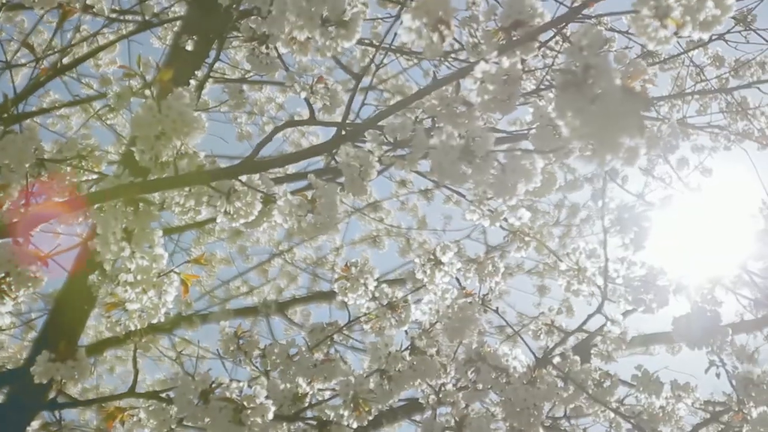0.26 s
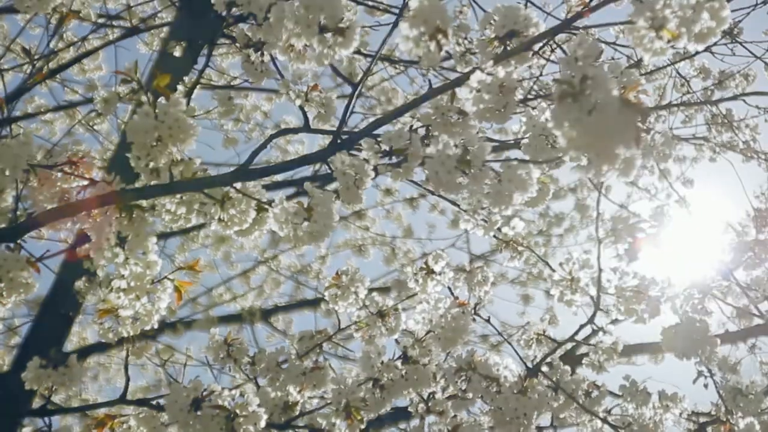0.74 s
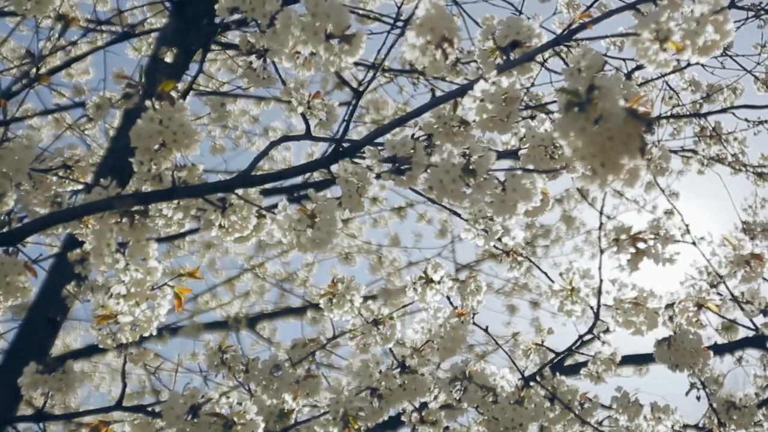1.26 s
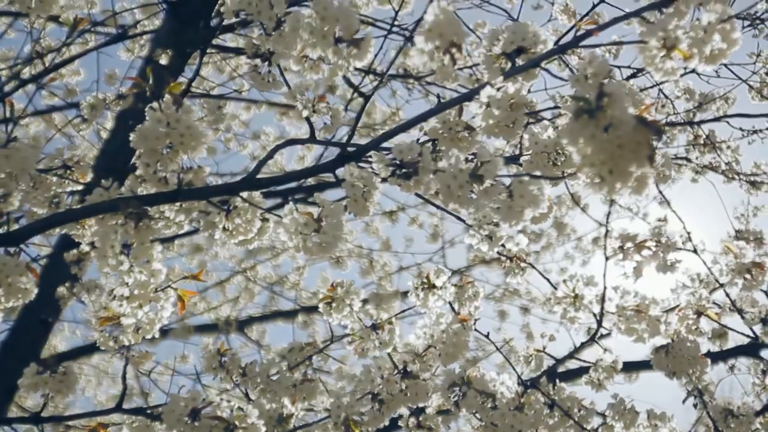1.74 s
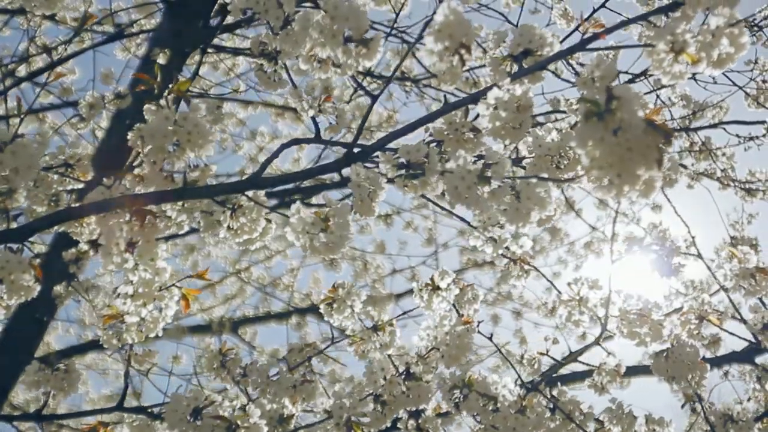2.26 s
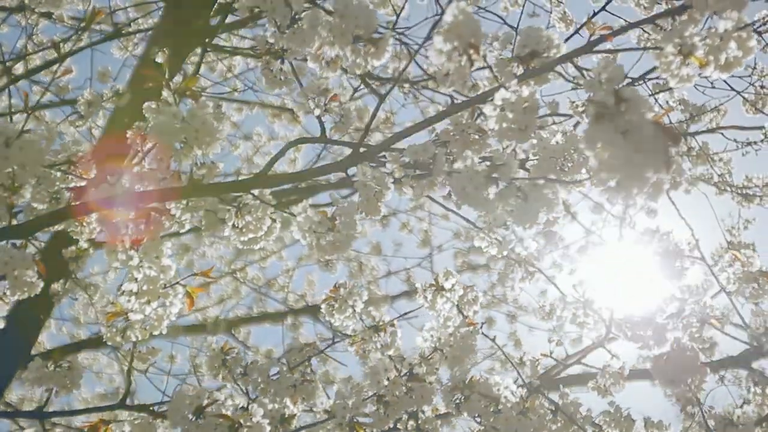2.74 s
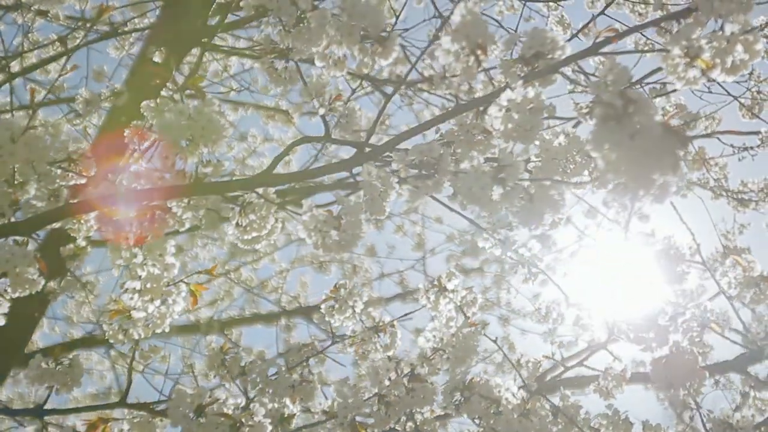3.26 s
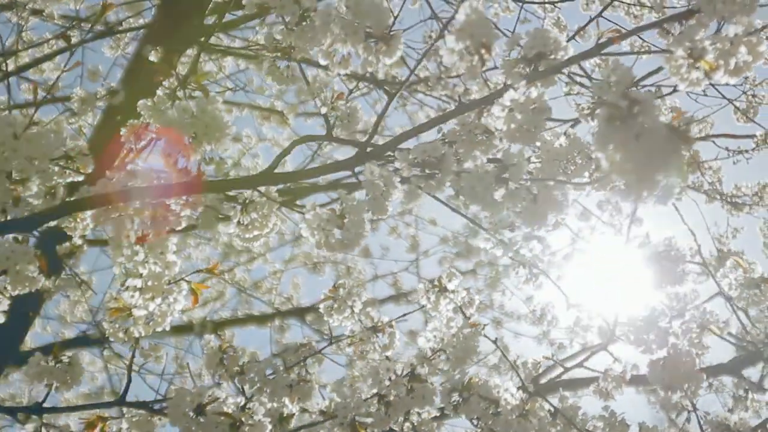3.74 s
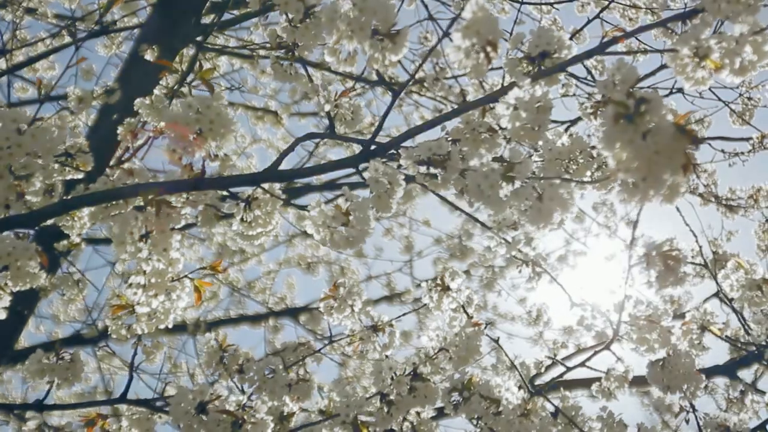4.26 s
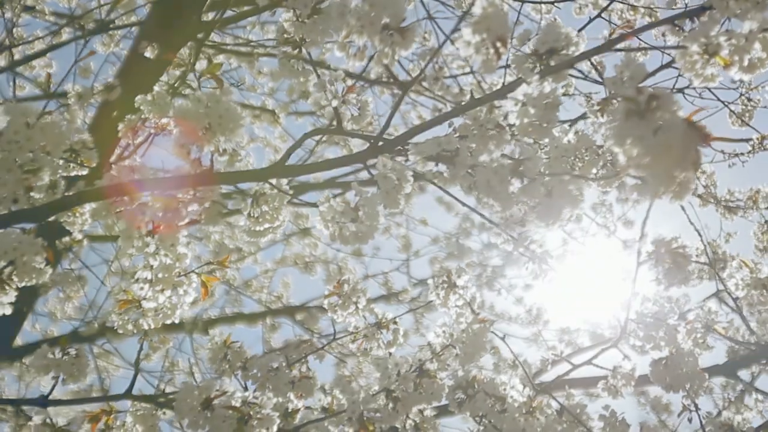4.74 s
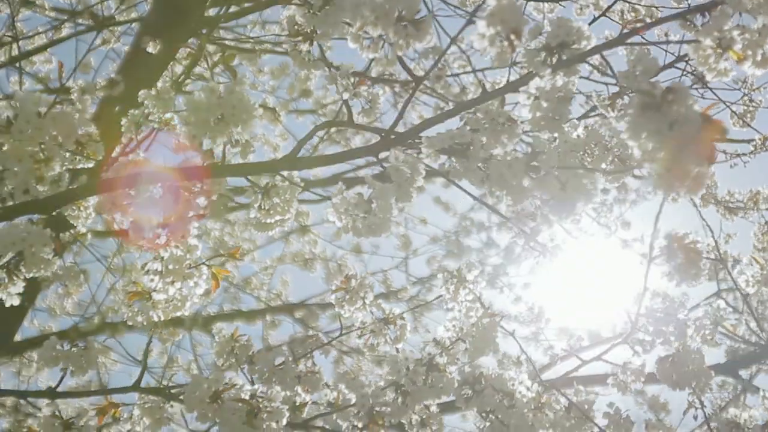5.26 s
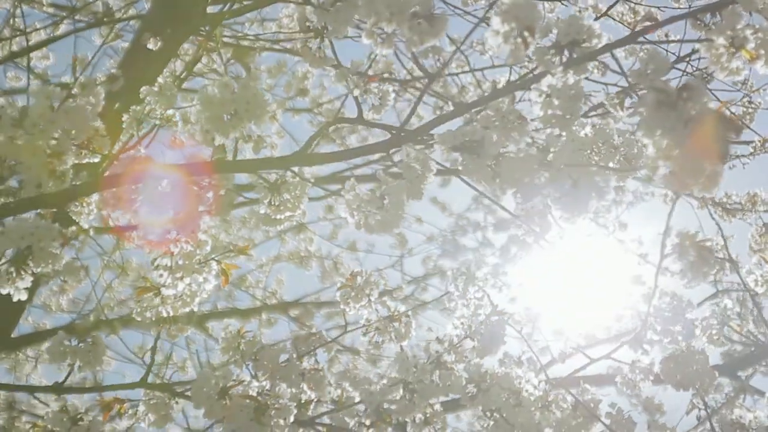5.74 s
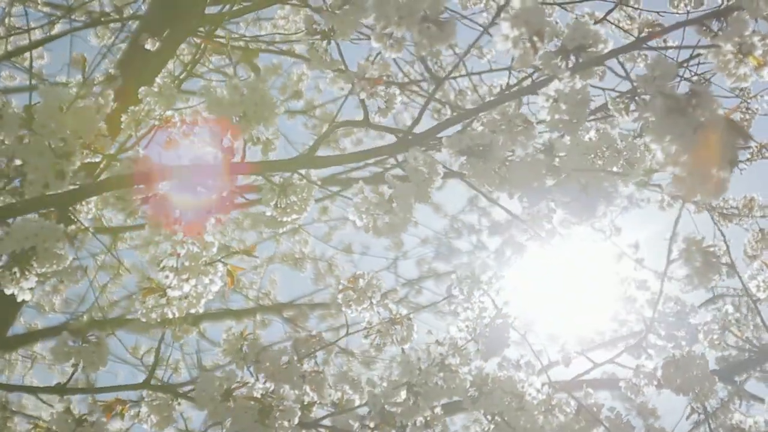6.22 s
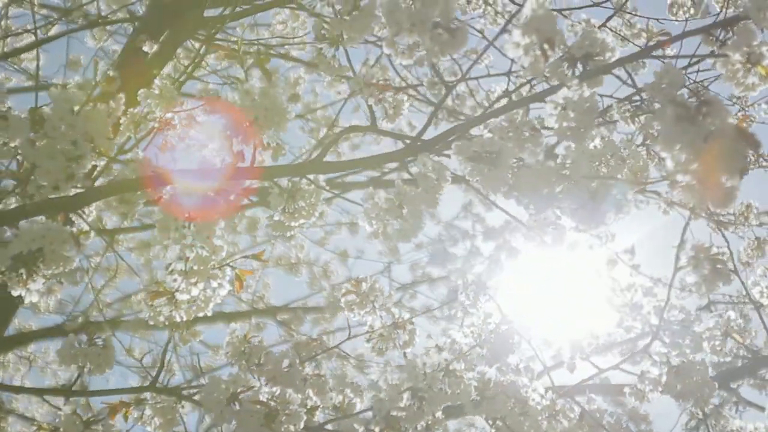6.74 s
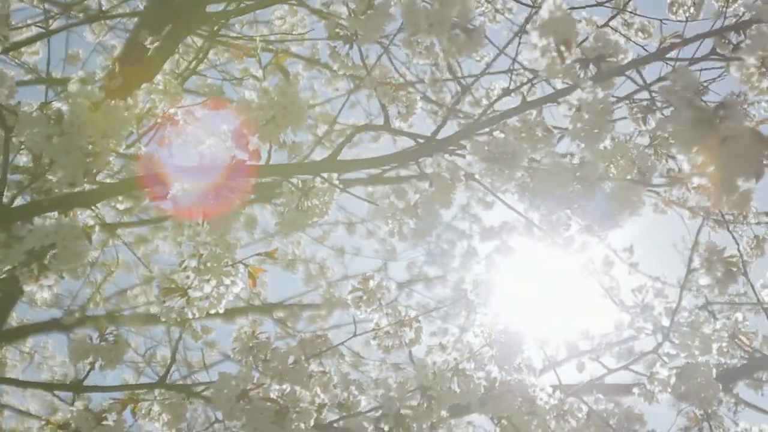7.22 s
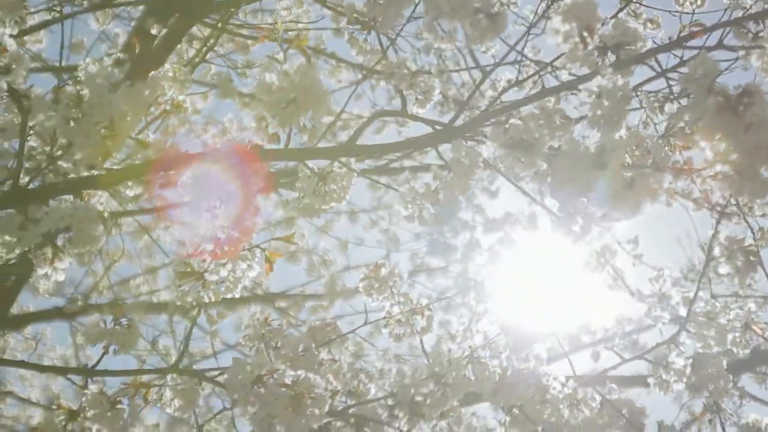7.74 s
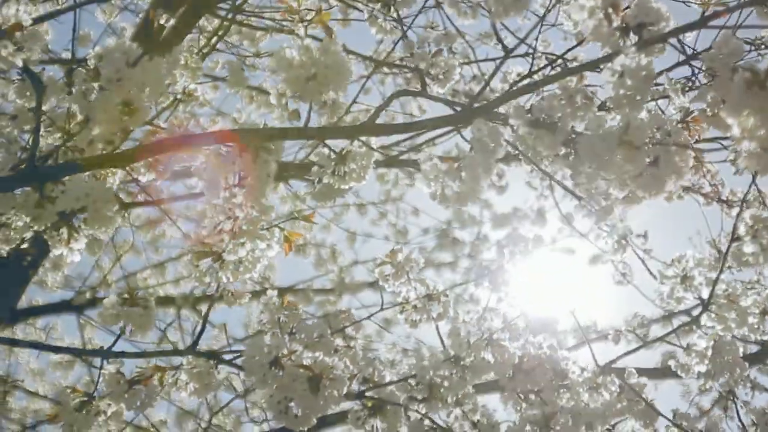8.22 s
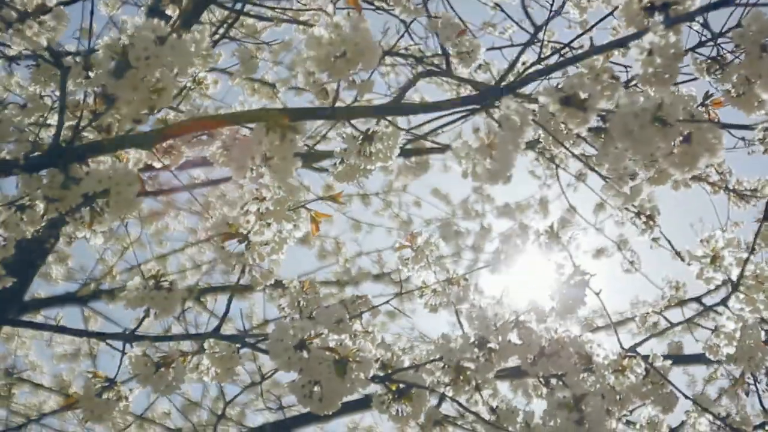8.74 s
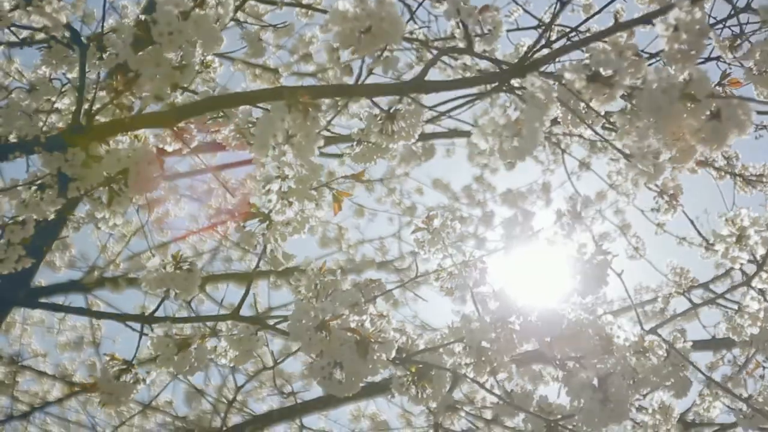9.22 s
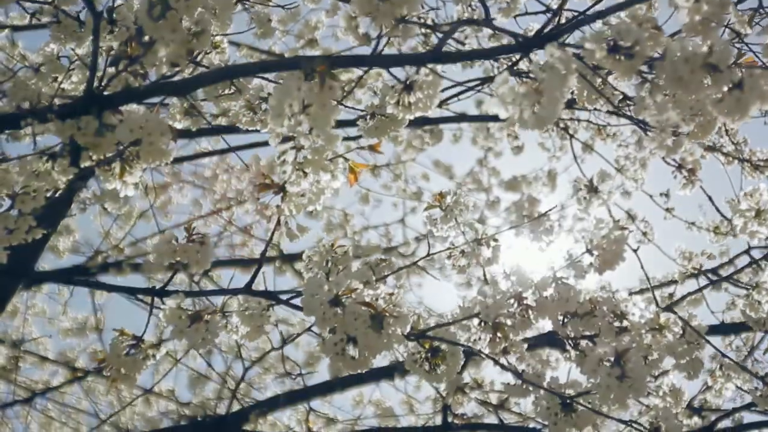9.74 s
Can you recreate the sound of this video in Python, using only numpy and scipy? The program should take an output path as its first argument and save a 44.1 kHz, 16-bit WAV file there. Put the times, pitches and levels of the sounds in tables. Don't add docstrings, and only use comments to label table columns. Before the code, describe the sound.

Stereo microphone in a spring garden among trees and walls. Brief high twitter opens, then sparse paired finch chirps on the left. A thrush there alternates falling and rising whistles. A blackbird a few paces ahead flutes mellow notes, warbles loudly, then twitters and rattles into two-voiced notes. A sharp twig or beak snap and a rising chirp follow, then faint distant warblers and traffic hush.

```python
import sys
import numpy as np
from scipy import signal
from scipy.fft import rfft, irfft, next_fast_len
from scipy.io import wavfile
from scipy.ndimage import uniform_filter1d, map_coordinates

SR = 44100
rng = np.random.default_rng(int(sys.argv[2]) if len(sys.argv) > 2 else 0)


def transcribe(u):
    v = np.clip(np.atleast_2d(u).T, -1, 1)
    q = np.round(v * 32767).astype(np.int16)
    wavfile.write(sys.argv[1], SR, q)


def volts_from_db(level):
    exponent = np.asarray(level, float) / 20
    return 10 ** exponent


N = 440118


def add(out, start_s, x):
    i = int(round(start_s * SR))
    out[max(i, 0):i + len(x)] += x[max(-i, 0):N - i]


def delay(x, ms):
    size = next_fast_len(N)
    turns = np.arange(size // 2 + 1) / size * ms * SR / 1000
    return irfft(rfft(x, size) * np.exp(-2j * np.pi * turns), size)[:N]


def drift(rate_hz, channels=1):
    hold = int(SR / rate_hz)
    steps = np.repeat(rng.standard_normal((channels, N // hold + 1)), hold, axis=1)[:, :N]
    return uniform_filter1d(steps, hold)


def shimmer(db, rate_hz, channels=1):
    return volts_from_db(db * drift(rate_hz, channels))


WALL_MS = dict(blackbird=15, thrush=121, finch=60, far=70)
# delay/ms, level/dB
NEAR = dict(blackbird=(3.3, -17), thrush=(6, -16), finch=(11, -6), far=(8, -8))


def garden(dry, bird, pan_db, lag_ms, scatter_db, t60_s, echo_db):
    sway_ms, sway_hz, alike = .12, 18, 0.47
    t = np.arange(int(.8 * SR)) / SR
    shared, own = rng.standard_normal(len(t)), rng.standard_normal((2, len(t)))
    noise = np.sqrt(alike) * shared + np.sqrt(1 - alike) * own
    dull = signal.lfilter([.4], [1, -.6], noise)
    bright = (noise - dull) * volts_from_db(-60 * t / 0.47)
    cloud = (dull + bright) * volts_from_db(-60 * t / t60_s) * np.clip(t / 0.0025, 0, 1)
    cloud *= volts_from_db(scatter_db) / np.sqrt(np.sum(cloud ** 2, axis=1, keepdims=True))

    sides_db = np.array([[pan_db], [-pan_db]])
    direct = np.array([delay(dry, lag_ms), dry]) * volts_from_db(sides_db / 2)
    near_ms, near_db = NEAR[bird]
    bounce = np.array([delay(dry, near_ms * 1.06), delay(dry, near_ms)])
    direct = direct + volts_from_db(near_db) * bounce * shimmer(3, 25, channels=2) * volts_from_db(sides_db / 2)

    sway = sway_ms * SR / 1000 * drift(sway_hz)[0]
    swayed = map_coordinates(dry, [np.arange(N) + sway], mode="nearest")
    scattered = signal.fftconvolve(swayed[None], cloud, axes=1)[:, :N] * shimmer(3.04, 40, channels=2)
    heard = direct + scattered * volts_from_db(sides_db / 4)

    late = WALL_MS[bird] * SR // 1000
    heard[:, late:] += volts_from_db(echo_db) * signal.lfilter([1, -.7], [1], heard[::-1, :N - late])
    return heard


def trace(rows, smooth_s=0.0051):
    s, *columns = np.transpose(rows)
    t = np.arange(s.min(), s.max(), 1 / SR)
    gate = np.clip(np.minimum(t - t[0], t[-1] - t) / 0.0021, 0, 1)
    width = int(min(smooth_s, np.ptp(s) / 10) * SR)
    return t, gate, [uniform_filter1d(np.interp(t, s, c), width, mode="nearest") for c in columns]


def phase_of(hz, waver=0.0022):
    tremble = uniform_filter1d(rng.standard_normal(len(hz)), 100) * 10
    return 2 * np.pi * (rng.random() + np.cumsum(hz * (1 + waver * tremble)) / SR)


def whistle(out, rows, overtones_db=(0,), shift_s=0, db=0, factor=1, warble=np.zeros_like, throb=0,
            rough=0.45, effort=0.42):
    beak_dip_hz, beak_dip_width_hz, beak_dip_db = 8700, 900, -10
    t, gate, (hz, level_db, *depth_hz) = trace(rows)
    turn = warble(t)
    hz = factor * hz + sum(depth_hz) * (np.sin(turn) + 0.22 * np.sin(2 * turn))
    gate = gate * (1 + np.clip(throb * sum(depth_hz) / 200, 0, 1) * np.sin(turn))
    phase = phase_of(hz)
    wave = np.sin(phase)
    for k, over_db in enumerate(overtones_db[1:], 2):
        flutter = 1 + rough * 8 * uniform_filter1d(rng.standard_normal(len(t)), 64)
        push_db = (k > 2) * effort * (level_db + db + 25)
        dip_db = beak_dip_db * np.exp(-((k * hz - beak_dip_hz) / beak_dip_width_hz) ** 2)
        wave += volts_from_db(over_db + push_db + dip_db) * flutter * np.sin(k * phase) * (k * hz < SR / 2)
    add(out, t[0] + shift_s, np.sqrt(2) * gate * volts_from_db(level_db + db) * wave)


def repeat(out, shape, calls, overtones_db=(0,), lift_db=0, warble_hz=0, throb=0):
    def uneven_warble(t):
        wander = .8 * 20 * uniform_filter1d(rng.standard_normal(len(t)), size=400)
        return 2 * np.pi * warble_hz * t + wander

    for s, db, *own in calls:
        factor, stretch = [*own, 1, 1][:2]
        rows = np.array(shape, float).T
        rows[0] *= stretch
        whistle(out, rows.T, overtones_db, s, db + lift_db, factor, uneven_warble, throb)


def coloured(points, db, offset=((1, 0), (2, 0))):
    size = next_fast_len(N)
    log_hz = np.log(np.arange(1, size // 2 + 2) * SR / size)

    def gain(curve):
        hz, curve_db = np.transpose(np.array(curve))
        return volts_from_db(np.interp(log_hz, np.log(hz), curve_db))

    shape = gain(points)
    noise = irfft(rfft(rng.standard_normal(size)) * shape * gain(offset), size)[:N]
    return noise * volts_from_db(db) / np.sqrt(np.mean(shape ** 2))


def swells(events):
    rise_s, fade_s = .13, .33
    t = np.arange(N) / SR
    return sum(np.interp(t, [a - rise_s, a, b, b + fade_s], [0, db, db, 0]) for a, b, db in events)


# f/Hz, level per Hz/dB
HUSH = [(20, -28), (80, -30), (125, -14.5), (285, -3), (880, -1.5), (2300, -14), (13800, -24),
        (15400, -44.5)]
# f/Hz, side minus mid level/dB
HUSH_SIDE = [(30, -5), (200, -28), (380, -22.5), (700, -11), (1290, -6), (2370, 0.5), (4380, 0.5),
             (9000, -20)]
# from t/s, to t/s, lift/dB
ENGINES = [
    (1.39, 1.42, 7),
    (4.22, 5.5, 9),
    (8.59, 8.95, 7),
]
# from t/s, to t/s, lift/dB
GUSTS = [(8.8, 9.3, 4)]


def air():
    hush_db, hush_lag_ms, rumble_db, breeze_db = -54.5, 0.047, -87, -65
    t = np.arange(N) / SR
    mid, side = coloured(HUSH, hush_db), coloured(HUSH, hush_db, HUSH_SIDE)
    mid *= volts_from_db(.5 * np.interp(t, np.arange(21) / 2, rng.standard_normal(21)))
    engine = coloured([(55, -25.5), (75, 1.5), (95, 0), (125, -35), (400, -66)], -1.5)
    mid += engine * volts_from_db(rumble_db + swells(ENGINES))
    leaves = [coloured([(500, -51.5), (3000, -8.5), (9000, -1.5), (15000, -3)], 0) for _ in range(2)]
    hush = np.array([delay(mid, hush_lag_ms) + side, mid - side])
    return hush + volts_from_db(breeze_db + swells(GUSTS)) * np.array(leaves)


# t/s, f/Hz, level/dB
SEEP = [(0, 8095, -16), (.016, 7954.5, -8), (.026, 6894, 4.5), (.036, 6505, 0), (.04, 6550, -14)]
# t/s, level/dB, pitch factor
SEEPS = [(5.526, -32.5, 1.005), (5.574, -35, 1.01), (5.737, -30, 0.99), (5.787, -35, 1.04)]
# t/s, f/Hz, level/dB
TSIP = [(0, 6330, -5), (.008, 6050, 1), (.018, 5800, -3.5), (.023, 5500, -10)]
# t/s, level/dB
TSIPS = [(5.657, -37), (5.703, -49), (5.874, -36), (5.918, -46)]
# t/s, f/Hz, level/dB
FLICK = [(0, 7620, -3), (.005, 7000, -5), (.009, 6300, 3), (.013, 5600, -9), (.017, 5050, -1),
         (.02, 4950, -8)]
# t/s, level/dB
FLICKS = [(-.008, -35.5), (.089, -37), (.189, -39.5)]
# t/s, f/Hz, level/dB
TICK = [(0, 4190, -3), (.003, 4900, 2), (.006, 5700, -8), (.011, 5250, -12), (.015, 5100, -1),
        (.019, 5150, -9)]
# t/s, level/dB, pitch factor
TICKS = [(.056, -38.5, 0.98), (0.150, -38.5, 0.98), (.17, -46, 1), (5.523, -58, .86), (5.583, -48, 0.83)]
# t/s, f/Hz, level/dB
PIP = [(0, 2140, -1), (.007, 2590, -2.5), (.018, 2805, 0), (.022, 2800, -10)]
# t/s, level/dB
PIPS = [(-.018, -47), (.068, -44.5), (.168, -44.5)]


def blackbird_twitter(out):
    for shape, calls in [(SEEP, SEEPS), (TSIP, TSIPS), (FLICK, FLICKS), (TICK, TICKS), (PIP, PIPS)]:
        repeat(out, shape, calls, [0, -17])


# t/s, f/Hz, level/dB
CHIRP = [(0, 3380, -24), (.013, 3500, -15), (.021, 3660, -5), (.033, 3980, 2), (.04, 4330, -0.5),
         (.045, 4400, -14.5)]
# t/s, level/dB, pitch factor, length factor
CHIRPS = [(.033, -43, .97, 1.25), (.935, -33.5), (1.078, -35), (1.9, -67), (2.534, -48, 1, .9),
          (2.669, -37), (3.17, -64), (4.09, -35), (4.215, -30), (5.721, -32.5), (5.85, -30), (8.485, -36),
          (8.621, -36), (9.58, -39)]
# t/s, f/Hz, level/dB
DROP = [(0, 4420, 4), (.005, 3272, -4), (.01, 3524, -14), (.018, 4300, -4), (.022, 4300, -11)]
# t/s, level/dB
DROPS = [(1.128, -42), (2.712, -37), (4.259, -30), (5.894, -30), (8.526, -39)]
# t/s, f/Hz, level/dB
LONG_CALL = [(7.033, 2850, -58), (7.06, 2740, -52.5), (7.09, 2860, -50), (7.165, 2950, -47),
             (7.177, 3010, -38), (7.21, 3390, -31), (7.236, 4176, -27.5), (7.25, 4290, -40),
             (7.256, 4200, -51.5)]
# left minus right/dB, left lag/ms, scatter/dB, t60/s, wall echo/dB
FINCH_AT = (7.7, 0.23, -3, 0.38, -20)


def finch():
    out = np.zeros(N)
    repeat(out, CHIRP, CHIRPS)
    repeat(out, DROP, DROPS)
    whistle(out, LONG_CALL, [0, -46, -36])
    return garden(out, "finch", *FINCH_AT)


# t/s, length/s, from f/Hz, to f/Hz, level/dB
GLIDES = [(.6, .5, 1460, 1320, -68), (1.63, .08, 2220, 2200, -64), (1.72, .12, 2680, 2420, -67),
          (2.555, .015, 7600, 8400, -60), (3.4, .06, 1253, 1180, -61), (1.36, .12, 1850, 2050, -68),
          (3.79, .17, 3370, 3290, -60), (6.82, .025, 3500, 4200, -60), (6.865, .025, 5200, 5200, -60),
          (7.25, .07, 4850, 5100, -58), (7.09, .03, 4600, 4000, -61), (7.47, .035, 4600, 3800, -49),
          (8.065, .09, 4100, 2600, -56), (8.92, .21, 8500, 7370, -68), (9.62, .04, 2900, 3400, -63)]
# share of length, share of top pitch, level/dB
LIFT = [(0, .91, -4), (.55, 1, 0), (1, 1, -6)]
# t/s, length/s, top f/Hz, level/dB
LIFTS = [(6.84, .02, 4250, -60), (6.96, .045, 4250, -63), (7.025, .045, 5130, -64), (7.405, .05, 5280, -55),
         (8.03, .04, 4190, -51)]
# share of length, share of top pitch, level/dB
ARCH = [(0, .79, -6), (.25, .99, 0), (.48, 1, -1), (.78, .89, -6), (1, .75, -5)]
# t/s, length/s, top f/Hz, level/dB
ARCHES = [(8.23, .11, 4040, -51.5), (8.415, .105, 4020, -53), (9.372, .03, 3330, -54)]
# share of length, share of top pitch, level/dB
SCOOP = [(0, .88, -6), (.3, .81, -5), (.6, .82, -6), (.85, .95, -2), (1, 1, -1)]
# t/s, length/s, top f/Hz, level/dB
SCOOPS = [(8.76, .085, 3290, -57), (8.925, .07, 3400, -58), (9.075, .065, 3330, -58),
          (9.205, .09, 3370, -58)]
# t/s, f/Hz, level/dB
STAIRS = [
    [(7.6, 4140, -60), (7.612, 3790, -55), (7.63, 4320, -48), (7.642, 5020, -58), (7.66, 4900, -48),
     (7.685, 5300, -66), (7.7, 5750, -59), (7.72, 5730, -60)],
    [(7.83, 3000, -60), (7.842, 3500, -59), (7.87, 3250, -53), (7.885, 3550, -61), (7.9, 4520, -48),
     (7.92, 4470, -54), (7.932, 4950, -56), (7.942, 5750, -60)],
]


def far_warblers():
    out = np.zeros(N)
    for shape, calls in [(LIFT, LIFTS), (ARCH, ARCHES), (SCOOP, SCOOPS)]:
        for s, length_s, top_hz, db in calls:
            whistle(out, np.array(shape) * (length_s, top_hz, 1), shift_s=s, db=db)
    for s, length_s, from_hz, to_hz, db in GLIDES:
        half_hz = from_hz + .4 * (to_hz - from_hz)
        rows = [(0, from_hz, -4), (length_s / 2, half_hz, 0), (length_s, to_hz, -4)]
        whistle(out, rows, shift_s=s, db=db)
    for rows in STAIRS:
        whistle(out, rows)
    return out * .75 * shimmer(5, 40)[0]


# t/s, level/dB, low edge f/Hz
SNAPS = [
    (2.125, -39, 695.7),
    (2.122, -41, 3000),
    (7.183, -24, 1000),
    (7.184, -33, 3800),
]


def snaps():
    out, t = np.zeros(N), np.arange(int(.1 * SR)) / SR
    knock_s, knock_db, knock_hz, knock_t60_s = 7.186, -45, 663, 0.15
    add(out, knock_s, volts_from_db(knock_db) * np.sin(2 * np.pi * knock_hz * t) * volts_from_db(-60 * t / knock_t60_s))
    for s, db, edge_hz in SNAPS:
        crack = rng.standard_normal(len(t)) * volts_from_db(-60 * t / .012)
        band = signal.butter(3, [edge_hz, min(3 * edge_hz, 7500)], "band", fs=SR, output="sos")
        add(out, s, volts_from_db(db) * signal.sosfilt(band, crack))
    return out


# left minus right/dB, left lag/ms, scatter/dB, t60/s, wall echo/dB
FAR_AT = (-1.5, .01, -2, .35, -16)


def far_birds_and_snaps():
    return garden(far_warblers() + snaps(), "far", *FAR_AT)


# t/s, f/Hz, level/dB
HOOK = [(0, 5695, -6.5), (.007, 6294, 3.5), (.014, 6498, 1), (0.022, 6297, -6)]
# t/s, f/Hz, level/dB
FALL = [(.01, 8550, -15.5), (.018, 7600, -5), (.025, 6150, 1), (.034, 5550, 4), (.055, 5160, 3),
        (0.09, 5030, 0), (.14, 5067, -6), (.155, 5070, -15.5)]
# t/s, level/dB, pitch factor, length factor
FALLS = [(3.269, -37.5, 1.0, 1.2), (3.779, -36, 0.99), (4.268, -35.5, 0.97), (4.763, -37.5, 0.98),
         (9.860, -42, 0.99, 1.2)]
# t/s, f/Hz, level/dB
TZIK = [(0, 9000, -8), (.004, 6500, 0), (.009, 4300, -3), (.012, 3800, -10)]
# t/s, level/dB
TZIKS = [(3.498, -52), (3.986, -48), (4.482, -50), (4.984, -51)]
# t/s, f/Hz, level/dB
RISE = [(0, 3016, -9), (.015, 3450, -12), (.035, 4033, 2), (.055, 4196, 4), (.15, 4150, -1.5),
        (.2, 4115, -15), (.23, 4130, -30)]
# t/s, level/dB, pitch factor, length factor
RISES = [(3.525, -35), (4.012, -36), (4.515, -38), (5.018, -41, 1, .85)]
# t/s, f/Hz, level/dB
UPTURN = [(0, 5150, -6), (.012, 5500, -2), (.02, 6050, 0), (.026, 6100, -8)]
# t/s, level/dB
UPTURNS = [(3.888, -49), (4.378, -48), (4.868, -51)]
# left minus right/dB, left lag/ms, scatter/dB, t60/s, wall echo/dB
THRUSH_AT = (5.5, 0.78, -2, 0.39, -19)


def thrush():
    out = np.zeros(N)
    repeat(out, HOOK, FALLS, lift_db=-8.5)
    repeat(out, FALL, FALLS, [0, -42])
    repeat(out, UPTURN, UPTURNS)
    repeat(out, TZIK, TZIKS)
    repeat(out, RISE, RISES)
    return garden(out, "thrush", *THRUSH_AT)


# t/s, f/Hz, level/dB
FLUTE = [
    [(3.535, 1553, -54), (3.575, 1636, -38), (3.62, 1982, -32), (3.645, 2122, -33), (3.65, 2000, -57)],
    [(3.73, 2080, -50.5), (3.755, 2078, -33), (3.8, 1650, -32.5), (3.85, 1607, -33.5), (3.93, 1662, -30.5),
     (3.95, 1717, -40)],
    [(4.05, 1884, -43.5), (4.068, 2142, -24.5), (4.1, 2063, -25), (4.225, 2065, -25), (4.238, 1840, -37.5)],
]
FLUTE_OVERTONES = [0, -36, -41, -33, -34, -40, -48, -44]
FLUTE_BRIGHT_DB = [0, 8, -3]


def blackbird_flutes(out):
    for rows, bright_db in zip(FLUTE, FLUTE_BRIGHT_DB):
        upper = np.arange(len(FLUTE_OVERTONES)) > 4
        whistle(out, rows, FLUTE_OVERTONES + bright_db * upper)


# t/s, f/Hz, level/dB
WARBLED = [
    [(4.362, 2840, -45.5), (4.375, 2963, -34), (4.41, 2640, -21.5), (4.535, 2171, -23), (4.7, 2740, -26),
     (4.745, 2503, -22.5), (4.78, 2450, -22.5), (4.85, 2450, -25), (4.87, 2080, -37.5)],
    [(5.0, 2437, -40), (5.022, 2708, -28), (5.045, 2590, -21), (5.15, 2215, -21.5), (5.185, 2030, -26),
     (5.215, 2180, -28), (5.27, 2480, -23), (5.335, 2680, -28.5), (5.385, 2700, -41)],
]
# crests t/s, widest t/s, depth f/Hz, throb of the airflow
WARBLE = [([4.545, 4.572, 4.596, 4.625, 4.652, 4.677, 4.702, 4.73, 4.757], 4.65, 300, .1),
          ([5.176, 5.203, 5.229, 5.256, 5.285, 5.309, 5.331, 5.355, 5.38], 5.21, 360, .55)]


def blackbird_warbles(out):
    for rows, (crests_s, widest_s, depth_hz, throb) in zip(WARBLED, WARBLE):
        s, hz, db = np.transpose(rows)
        t = np.linspace(s[0], s[-1], num=200)
        swell = np.interp(t, [crests_s[0] - .01, widest_s, crests_s[-1] + .01], [0, 1, 0])
        depth = depth_hz * swell ** .7
        turns = 2 * np.pi * (np.arange(len(crests_s)) + .2)
        note = np.transpose([t, np.interp(t, s, hz), np.interp(t, s, db), depth])
        whistle(out, note, FLUTE_OVERTONES, warble=lambda t: np.interp(t, crests_s, turns),
                throb=throb, rough=1.5)


# t/s, f/Hz, level/dB, buzz depth f/Hz
RATTLE = [(0, 2150, -9, 200), (.006, 2200, -6, 300), (.016, 2080, -5, 200), (.023, 2010, -1, 20),
          (.038, 2020, -2, 0), (.044, 2010, -18, 0)]
# t/s, level/dB, pitch factor, length factor
RATTLES = [(5.948, -37.5, .96, 1), (6.008, -42, 1.0, 1), (6.061, -37, .99, .95), (6.106, -38.5, .97, 1.05),
           (6.161, -37.5, 1.0, 1), (6.217, -37, 1.04, 1.12), (6.275, -43, 1.06, .6)]
RATTLE_OVERTONES = [-2.5, -5, -15, -17, -19, -24]
# t/s, f/Hz, level/dB, buzz depth f/Hz
BUZZ = [(0, 4250, -8, 500), (.005, 4150, 1, 520), (.02, 3930, 0.5, 440), (.03, 3950, -5, 220),
        (.036, 3950, -19, 101)]
# t/s, level/dB, pitch factor, length factor
BUZZES = [(5.949, -32.5, 1.1, .8), (6.008, -30, .97, 1.15), (6.061, -32, .92, .7), (6.11, -33, .91, .8),
          (6.162, -33, .92, .8), (6.216, -32, .97, 1.2), (6.276, -33, 1.04, .8), (6.3, -34, 1.1, 1.1)]


def blackbird_rattle(out):
    buzz_hz, sum_tone = 118, 1.55
    repeat(out, RATTLE, RATTLES, RATTLE_OVERTONES, warble_hz=buzz_hz, throb=0.39)
    repeat(out, BUZZ, BUZZES, [0, -17, -25], warble_hz=buzz_hz, throb=0.3)
    repeat(out, np.array(BUZZ) * (1, sum_tone, 1, sum_tone), BUZZES, [0, -8], -15, buzz_hz, throb=0.2)


# t/s, low voice f/Hz, high voice f/Hz, level/dB
DUET_LEAD = [(0, 2198, 4400, -7.5), (.035, 2290, 4420, 0), (.06, 2500, 4500, -9), (.068, 2520, 4500, -17)]
# t/s, level/dB
DUET_LEADS = [(6.29, -39)]
# t/s, low voice f/Hz, high voice f/Hz, level/dB
DUET = [(0, 2477, 3730, -10), (.026, 2510, 4120, -1), (.058, 2460, 4290, 0), (.077, 2570, 4350, -5),
        (.085, 2595, 4350, -17)]
# t/s, level/dB
DUETS = [(6.375, -42.5), (6.478, -43)]
# times low f, times high f, level/dB
DUET_LINES = [(1, 0, 0), (0, 1, -1), (2, 0, -8), (1, 1, -4), (0, 2, -18), (2, 1, -20), (1, 2, -18),
              (0, 3, -23)]


def blackbird_duets(out):
    for shape, calls in [(DUET_LEAD, DUET_LEADS), (DUET, DUETS)]:
        for s, call_db in calls:
            t, gate, (low_hz, high_hz, db) = trace(shape)
            low, high = phase_of(low_hz, waver=0.016), phase_of(high_hz, waver=0.023)
            voices = sum(volts_from_db(d) * np.sin(a * low + b * high) for a, b, d in DUET_LINES)
            add(out, s, np.sqrt(2) * gate * volts_from_db(db + call_db) * voices)


# left minus right/dB, left lag/ms, scatter/dB, t60/s, wall echo/dB
BLACKBIRD_AT = (-0.1, 0.022, -5, 0.35, -12)


def blackbird():
    out = np.zeros(N)
    blackbird_twitter(out)
    blackbird_flutes(out)
    blackbird_warbles(out)
    blackbird_rattle(out)
    blackbird_duets(out)
    return garden(out, "blackbird", *BLACKBIRD_AT)


def scene():
    return air() + blackbird() + finch() + far_birds_and_snaps() + thrush()


def band_limit(x):
    return signal.sosfilt(signal.butter(12, 15060, fs=SR, output="sos"), x)


def record(dry):
    mix = signal.sosfilt(signal.ellip(8, .2, 60, 14950, fs=SR, output="sos"), dry)
    return band_limit(mix)


dry = scene()
out = record(dry)
transcribe(out)
```